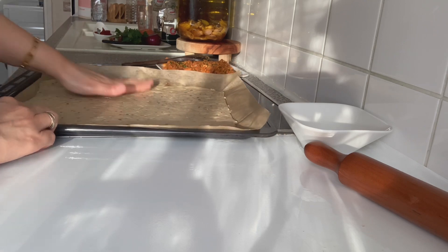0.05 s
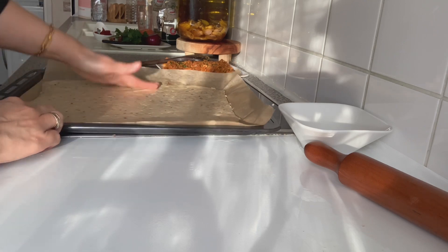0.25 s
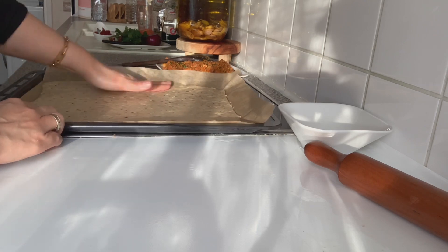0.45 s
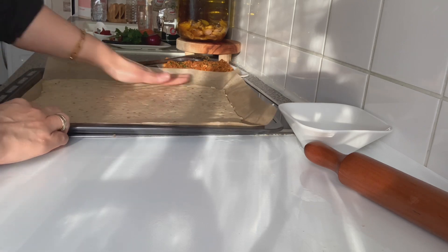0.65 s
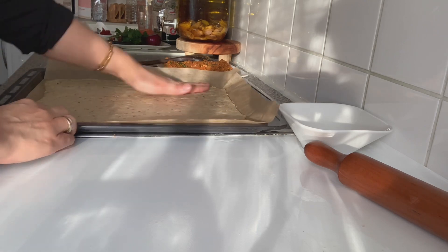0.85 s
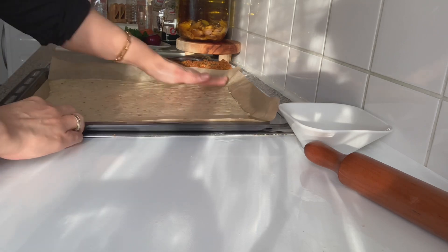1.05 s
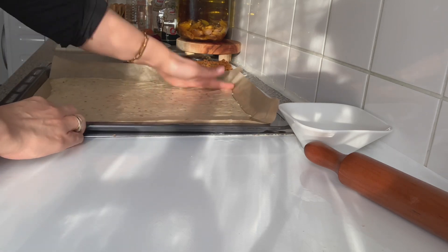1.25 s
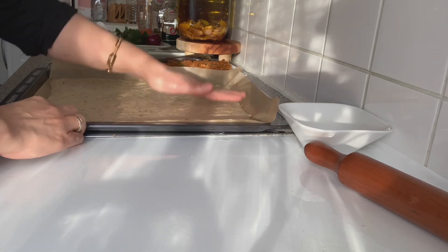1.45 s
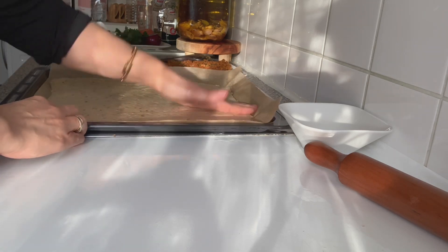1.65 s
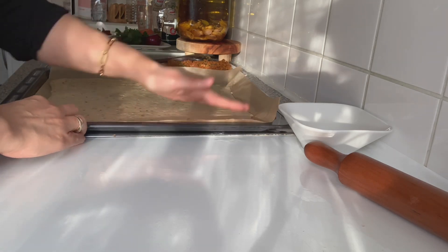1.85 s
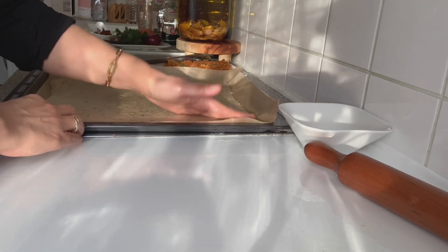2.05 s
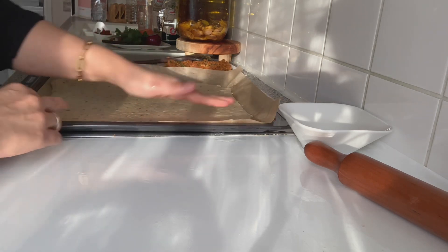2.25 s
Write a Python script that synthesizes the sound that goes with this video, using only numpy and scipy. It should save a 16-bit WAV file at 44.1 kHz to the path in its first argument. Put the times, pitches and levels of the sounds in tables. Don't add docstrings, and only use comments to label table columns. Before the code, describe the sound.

Hand patting baking paper on a metal tray, with soft thumps, tinny rattles and crisp crackles

```python
import sys
import numpy as np
from scipy import signal
from scipy.fft import rfft, irfft, next_fast_len
from scipy.io import wavfile
from scipy.ndimage import uniform_filter1d

SR = 44100
rng = np.random.default_rng(int(sys.argv[2]) if len(sys.argv) > 2 else 0)


def magnitude_from_level(level_db):
    exponent = np.asarray(level_db, float) / 20
    return 10 ** exponent


def pcm_store(signal):
    levels = np.round(np.clip(np.atleast_2d(signal), -1, 1) * 32767)
    wavfile.write(sys.argv[1], SR, levels.astype(np.int16).T)


N = 101429
TIME_S = np.arange(N) / SR


def rms_one(x):
    return x / np.sqrt(np.mean(x ** 2) + 1e-20)


def at_hz(points, hz):
    point_hz, values = np.transpose(points)
    return np.interp(np.log(hz), np.log(point_hz), values)


def band(x, low_hz, high_hz, order=2):
    edges_hz = [low_hz, min(high_hz, 0.45 * SR)]
    return signal.sosfilt(signal.butter(order, edges_hz, "band", fs=SR, output="sos"), x)


def soften(x, hz):
    r = np.exp(-2 * np.pi * hz / SR)
    return signal.lfilter([(1 - r) ** 2], [1, -2 * r, r * r], x)


def drift(hz):
    settle = SR // 10
    return rms_one(soften(rng.standard_normal(N + settle), hz)[settle:])


def ring(clicks, hz, t60):
    r = magnitude_from_level(-60 / (t60 * SR))
    w = 2 * np.pi * hz / SR
    return signal.lfilter([0, np.sin(w)], [1, -2 * r * np.cos(w), r * r], clicks + 1e-18)


def bursts(s, db, hold_s, rise_s):
    age = TIME_S - np.array(s)[:, None]
    swell = np.sin(np.pi / 2 * np.clip(age / rise_s + 0.19, 0, 1)) ** 2
    fall = np.exp(-np.maximum(age - 0.51 * rise_s, 0) / np.maximum(hold_s, 0.002)[:, None])
    return magnitude_from_level(db)[:, None] * swell * fall


def widen(mid, side):
    return mid + side * [[1], [-1]]


def pan(x, left_db):
    return x * magnitude_from_level([[left_db / 2], [-left_db / 2]])


# frequency in Hz, likeness from 0 to 1.
LIKENESS = [(60, 0.94), (240, 0.73), (950, 0.87), (3770, 0.029), (15000, 0.048)]


def colour(pair, spectrum, bright_db=0, patchy_db=0):
    out = 0
    edges = 25 * 2 ** np.arange(0, 9.6, 0.5)
    for k, (low, high) in enumerate(zip(edges, edges[1:])):
        mid, side = band(pair, low, high)
        hz = np.sqrt(low * high)
        alike = np.clip(at_hz(LIKENESS, hz), -1, 1)
        level_db = at_hz(spectrum, hz) + bright_db * np.log2(hz / 6000)
        gain = magnitude_from_level(level_db + patchy_db * drift(35))
        stereo = widen(np.sqrt(1 + alike) * mid, np.sqrt(1 - alike) * side)
        out = out + (-1) ** k * gain * stereo
    return rms_one(out)


def struck(modes, start_s, db, soft_hz, spread_s=0, loss_db=0, count=1, lag_s=0):
    late = np.cumsum(rng.uniform(0.25, 1.7, (len(start_s), count)), axis=1) * spread_s / count
    at = ((start_s[:, None] + lag_s + late - late[:, :1]) * SR).astype(int)
    contact_db = db[:, None] - loss_db * np.sqrt(np.arange(count))
    out = np.zeros(N)
    for hz, level_db, t60 in modes:
        clicks = np.zeros(N)
        clicks[at] = magnitude_from_level(contact_db + level_db + 2 * rng.standard_normal(at.shape))
        out += ring(soften(clicks, soft_hz), hz, t60)
    return band(out, 0.7 * modes[0][0], 9000, order=3)


# frequency in Hz, level in dB, T60 in seconds.
SHEET_MODES = [(95, -17.5, 0.12), (124.3, 1.5, 0.15), (139.6, -12, 0.27)]


def sheet_thump(start_s, db):
    return pan(struck(SHEET_MODES, start_s, db + 1, soft_hz=177), -3.5)


# frequency in Hz, level in dB, T60 in seconds.
TRAY_LOW = [(184, -16, 0.045), (230.5, -18, 0.076), (265.3, 0.5, 0.073), (299.1, -6.5, 0.16),
            (327.6, -8.5, 0.093), (361.6, -14.5, 0.077), (490, -2.5, 0.044)]


def tray_knock(start_s, db):
    knock = struck(TRAY_LOW, start_s, db - 2, soft_hz=520, spread_s=0.05, loss_db=9, count=9,
                   lag_s=0.00251)
    return pan(knock, -4)


# frequency in Hz, level in dB, T60 in seconds.
TRAY_HIGH = [(808.6, -10, 0.063), (891, -17.5, 0.081), (982, -10, 0.012), (1346, -4.5, 0.059),
             (1460, -5.5, 0.084), (1761, 3.5, 0.011), (1984, -8, 0.099), (2220, -3, 0.032),
             (2950, -11.5, 0.098), (3666, -5, 0.056), (4500, -5.5, .06)]


def finger_slap(start_s, db):
    slap = struck(TRAY_HIGH, start_s, db - 7, soft_hz=3700, spread_s=0.006275, loss_db=1.5, count=4)
    return pan(slap, 2.5)


def dough_smack(start_s, slap_db):
    t60_s, rise_s, ring_db, ring_t60_s = 0.041, 0.0041, -3.5, 0.035
    noise = rng.standard_normal((2, N))
    smack = rms_one(band(widen(noise[0], 0.87 * noise[1]), 644, 3280))
    drive = smack + 0.39 * noise
    ringing = sum(magnitude_from_level(db / 2) * ring(drive, hz, ring_t60_s) for hz, db, _ in TRAY_HIGH)
    smack = smack + magnitude_from_level(ring_db) * rms_one(ringing)
    hold_s = np.full(len(start_s), t60_s / np.log(1000))
    envelope = bursts(start_s, slap_db - 1, hold_s, rise_s).sum(axis=0)
    return smack * magnitude_from_level(2.3 * drift(220)) * envelope


# frequency in Hz, level in dB, T60 in seconds.
COUNTER = [(49.4, -10, 0.4), (60.2, 3.5, 0.47)]


def counter_boom(start_s, db):
    return pan(struck(COUNTER, start_s, db + 19, soft_hz=23.1, lag_s=0.021), -1.5)


# start in seconds, then knock, thump, slap and boom levels in dB.
PATS = [(0.004, -42, -40, -44, -40.5), (0.059, -47.5, -53, -50, -63), (0.133, -41.5, -56, -44.5, -47),
        (0.192, -43, -26.5, -32.5, -32.5), (0.202, -29.5, -27.5, -44, -40), (0.281, -45, -44, -53, -35),
        (0.328, -32.5, -52, -32.5, -39), (0.339, -28, -33.5, -26.5, -35), (0.493, -32, -25, -38, -38),
        (0.61, -48, -36.5, -53.5, -42.5), (0.667, -36, -48, -47, -41.5), (0.727, -21, -20.5, -24.5, -41),
        (0.819, -26, -67, -38.5, -45.5), (0.913, -38.5, -37.5, -44.5, -47), (0.987, -49, -26, -23.5, -33),
        (0.999, -12.5, -35, -23.5, -31.5), (1.025, -15, -32, -22.5, -49), (1.137, -31, -68, -54.5, -53),
        (1.451, -15.5, -27, -18, -40), (1.505, -27, -32, -59, -64), (1.606, -47.5, -72, -38, -68),
        (1.683, -41.5, -38.5, -42.5, -54), (1.849, -18, -35.5, -23, -49), (2.024, -34, -39, -32.5, -48)]


def pats():
    start_s, knock_db, thump_db, slap_db, boom_db = np.transpose(PATS)
    metal = sheet_thump(start_s, thump_db) + tray_knock(start_s, knock_db)
    skin = finger_slap(start_s, slap_db) + dough_smack(start_s, slap_db)
    return metal + skin + counter_boom(start_s, boom_db)


# time in seconds, level in dB.
RUSTLE = [(0, -37), (.17, -51), (.4, -45.5), (.5, -39), (.62, -55), (.78, -42.5), (.86, -45.5), (.97, -46),
          (1.12, -43), (1.27, -45), (1.4, -70), (1.55, -44), (1.78, -65), (1.9, -53), (2.06, -48),
          (2.13, -62.5), (2.27, -81)]


def rustle_db():
    return np.interp(TIME_S, *np.transpose(RUSTLE))


# frequency in Hz, level in dB.
RUMBLE = [(25, -17), (130, 5), (440, -20.5), (5000, -20.5), (16000, -44)]


def rumble():
    work_db = rustle_db()
    level_db = -52.5 + 0.3 * (work_db - work_db.mean())
    return magnitude_from_level(level_db) * colour(rng.standard_normal((2, N)), RUMBLE)


# frequency in Hz, level in dB per Hz.
PAPER = [(300, -27), (1000, -6.5), (2000, -6.5), (4000, 0), (6000, -5), (9000, 3.5), (12000, -5.5),
         (16000, 3)]
# start in seconds, peak in dB, length in seconds, tilt in dB per octave.
CRACKLES = [(0.045, -26, 0.024, -3.5), (0.2767, -20, 0.0085, -2), (0.301, -18.5, 0.014, -1.5),
            (0.358, -17.5, 0.015, -0.5), (0.3787, -15.5, 0.0078, 2.5), (0.542, -28, 0.015, -3),
            (0.868, -31.5, 0.015, -3), (0.879, -19, 0.022, -2), (0.9118, -20.5, 0.019, -2.5),
            (1.052, -15, 0.0073, -2), (1.071, -17, 0.013, -1), (1.097, -20.5, 0.0092, 2.5),
            (1.152, -18.5, 0.027, -1.5), (1.164, -19, 0.036, 2), (1.207, -26, 0.024, -1.5),
            (1.2286, -19, 0.025, -0.5), (1.251, -17, 0.015, 2.5), (1.501, -20.5, 0.025, -1.5),
            (1.5185, -19.5, 0.028, 3.5), (1.544, -15, 0.011, 3.5), (1.559, -23, 0.048, 0.5),
            (1.66, -21, 0.013, 3.5), (1.78, -40.5, 0.015, 2.5), (1.932, -23.5, 0.019, 2.5),
            (1.959, -24, 0.025, 0), (2.0368, -16.5, 0.0051, 4), (2.2806, -41, 0.012, -2.5)]
# start in seconds, peak in dB, length in seconds,
# tilt in dB per octave.
LANDINGS = [(0.183, -20, 0.033, -1), (0.341, -29.5, 0.027, 8), (0.492, -17.5, 0.014, 0),
            (0.661, -30, 0.042, -1.5), (0.7106, -26, 0.0069, -0.5), (0.725, -13.5, 0.0075, -0.5),
            (0.9829, -18.5, 0.016, -6.5), (1.04, -29, 0.017, 4.5), (1.422, -39.5, 0.062, -5),
            (1.4415, -22, 0.079, -5), (1.604, -15.5, 0.017, 0.5), (1.802, -28, 0.032, 0),
            (1.837, -26, 0.025, -2), (2.015, -22, 0.032, -1)]


def paper():
    grains_per_s, spread_db, turned = 9000, 2, 0.75
    hits = rng.random((2, N)) < grains_per_s / SR
    strength = magnitude_from_level(spread_db * np.minimum(rng.exponential(1, (2, N)), 5))
    mid, side = hits * strength * rng.choice([-1, 1], (2, N))
    quarter_turn = signal.hilbert(mid, next_fast_len(N))[:N].imag
    side = turned * quarter_turn + np.sqrt(1 - turned ** 2) * side
    s, db, hold_s, bright_db = np.transpose(CRACKLES + LANDINGS)
    each = bursts(s, db - 9, hold_s, rise_s=0.0083) ** 2
    power = each.sum(axis=0) + magnitude_from_level(2 * rustle_db())
    tilt_db = bright_db @ each / power
    grains = colour([mid, side], PAPER, tilt_db, patchy_db=4)
    return grains * np.sqrt(power) * magnitude_from_level(1.8 * drift(90))


# start in seconds, level in dB, frequency in Hz, T60 in seconds.
FLEXES = [(.196, -32.5, 348, 0.11), (.27, -42, 340, .08), (.336, -23.5, 1040, 0.069),
          (.494, -30.5, 350, 0.074), (.735, -34, 492, 0.16), (1.452, -37, 814, 0.077),
          (1.852, -27.5, 520, 0.081), (2.04, -43, 268.3, 0.3), (.225, -34, 130, .12), (0.283, -28, 190, .1),
          (0.344, -27, 350, .06), (.37, -41, 190, .1), (0.522, -36.5, 265, .15), (0.612, -34, 130, .1),
          (0.644, -36.5, 90, .1), (0.769, -28, 200, .08), (.73, -34.5, 799, .12), (1.2, -48.5, 400, .12),
          (1.251, -45, 230, .12)]


def flexes():
    rise_s = 0.0027
    out = np.zeros(N)
    for s, db, hz, t60 in FLEXES:
        age = np.maximum(TIME_S - s, 0)
        envelope = magnitude_from_level(db - 60 * age / t60) * (1 - np.exp(-age / rise_s))
        out += envelope * np.sin(2 * np.pi * hz * age)
    return pan(out, -4)


# start in seconds, peak in dB, centre in Hz, length in seconds.
SNAPS = [(0.281, -33.5, 1780, 0.0079), (0.4276, -33.5, 5570, .004), (0.435, -39.5, 3600, .004),
         (.4612, -30, 6000, 0.0031), (0.487, -30, 1200, 0.0074), (0.503, -30.5, 6000, .005),
         (0.538, -42, 5500, .006), (0.5718, -35, 3600, 0.0028), (0.605, -47.5, 1200, 0.0048),
         (0.6452, -44, 4500, 0.011), (0.6583, -35, 3800, .004), (.6922, -44, 6500, 0.0052),
         (0.717, -27, 3800, 0.0071), (0.7264, -18, 2400, 0.0074), (0.9962, -18, 2400, 0.0025),
         (1.0255, -24.5, 3200, 0.0037), (1.1013, -32.5, 6000, 0.0081), (1.165, -46, 4500, .005),
         (1.251, -34, 5500, 0.01), (1.2615, -28, 4200, 0.0033), (1.54, -34.5, 5500, 0.0063),
         (1.609, -40, 2400, 0.0066), (1.664, -37.5, 4000, 0.0059), (1.808, -40.5, 5500, 0.021),
         (1.941, -36, 4800, 0.0036), (2.0282, -37, 2000, 0.0028), (2.03, -32.5, 3000, 0.0063)]


def snaps():
    octaves, width, ring_db, ring_cycles = 0.67, 0.83, -5, 40
    s, db, hz, hold_s = np.transpose(SNAPS)
    half = 2 ** (octaves / 2)
    noise = rng.standard_normal((2, N))
    pair = widen(noise[0], width * noise[1])
    starts = (s * SR).astype(int) - 100
    out = np.zeros((2, N))
    for start, centre_hz, shape in zip(starts, hz, bursts(s, db, hold_s, rise_s=0.001)):
        now = slice(start, start + SR // 20)
        puff = rms_one(band(pair[:, now], centre_hz / half, centre_hz * half, order=1))
        tone = rms_one(ring(puff, centre_hz, ring_cycles / centre_hz))
        out[:, now] += (puff + magnitude_from_level(ring_db) * tone) * shape[now]
    return out


# frequency in Hz, level in dB, T60 in seconds.
RIM = [(2010, 1, 0.3), (3520, -9, 0.38), (3640, -6, .3)]
# start in seconds, level in dB.
RIM_HITS = [(.728, -43), (2.028, -46.5)]


def rim():
    s, db = np.transpose(RIM_HITS)
    clicks = np.zeros(N)
    clicks[(s * SR).astype(int)] = magnitude_from_level(db)
    return sum(magnitude_from_level(level_db + 3 * drift(30)) * ring(clicks, hz, t60) for hz, level_db, t60 in RIM)


def kitchen(x):
    t60_s, wall_cut_hz = 0.35, 7100
    size = next_fast_len(N + SR)
    z = np.exp(-2j * np.pi * np.arange(size // 2 + 1) / size)
    dull = np.exp(-2 * np.pi * wall_cut_hz / SR)
    wall = (1 - dull) / (1 - dull * z)
    lags = (rng.uniform(0.008, 0.035, (2, 8)) * SR).astype(int)
    out = []
    for side in lags:
        response = 0
        for k, lag in enumerate(side):
            loop = magnitude_from_level(-60 * lag / SR / t60_s) * wall * z ** lag
            response = response + (-1) ** k * loop / (1 - loop)
        out.append(irfft(rfft(x, size) * response, size)[:N])
    return np.array(out)


def scene():
    metal = pats() + flexes() + rim()
    sheet = paper() + snaps()
    tray_send = magnitude_from_level(-16) * band(metal[0], 210, 13000)
    paper_send = magnitude_from_level(-15.5) * sheet[0]
    return metal + sheet + kitchen(tray_send + paper_send) + rumble()


def top_cut(x):
    return signal.sosfilt(signal.butter(12, 16990, fs=SR, output="sos"), x)


# centre in Hz, width in Hz.
GAPS = [(9450, 1430), (13200, 2370)]


def record(dry):
    depth, fill_db, flicker_db = 0.4, 1, 1.5
    power = np.mean(band(dry, 5000, 15000) ** 2, axis=0) + 1e-12
    rise_db = 10 * np.log10(uniform_filter1d(power, size=900) / soften(power, 12))
    calm = 1.0 * (rise_db + flicker_db * drift(20) < fill_db)
    shut = 1 - depth + depth * uniform_filter1d(calm, size=200)
    x = dry
    for hz, width_hz in GAPS:
        edges_hz = [hz - width_hz / 2, hz + width_hz / 2]
        gap = signal.butter(3, edges_hz, "bandstop", fs=SR, output="sos")
        x = x + shut * (signal.sosfiltfilt(gap, x) - x)
    x = signal.sosfilt(signal.cheby2(12, 60, 16300, fs=SR, output="sos"), x)
    x = signal.sosfilt(signal.butter(3, 42, "high", fs=SR, output="sos"), x)
    return top_cut(x)


dry = scene()
out = record(dry)
pcm_store(out)
```